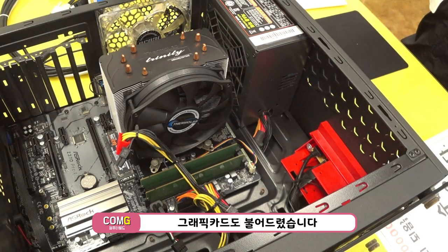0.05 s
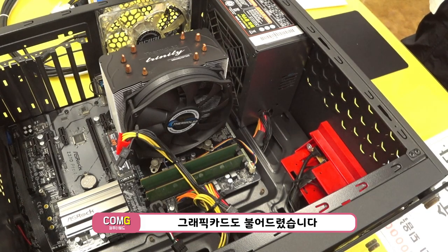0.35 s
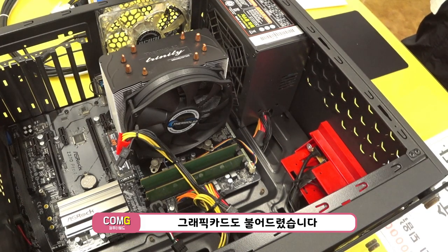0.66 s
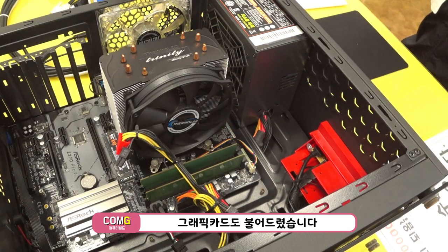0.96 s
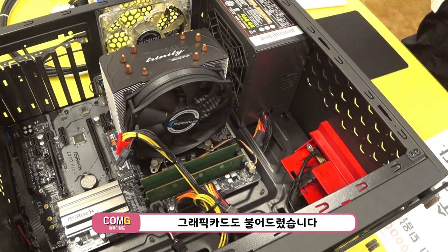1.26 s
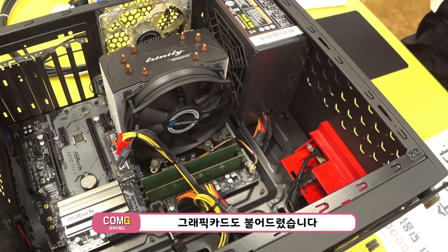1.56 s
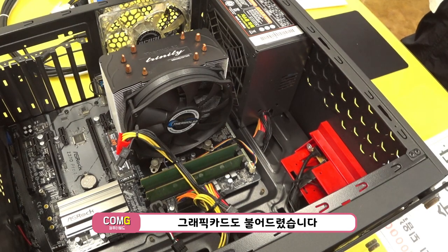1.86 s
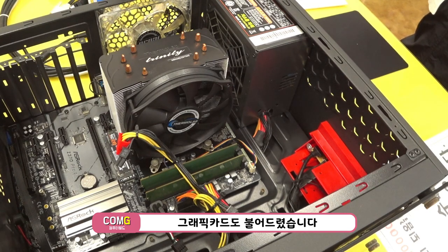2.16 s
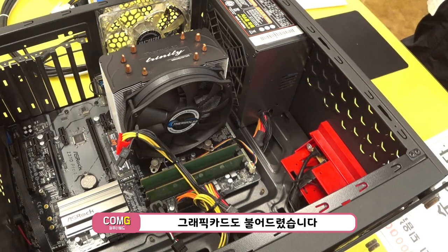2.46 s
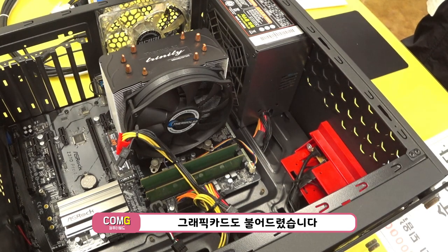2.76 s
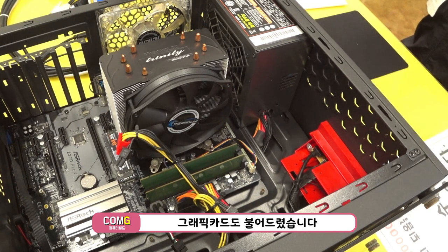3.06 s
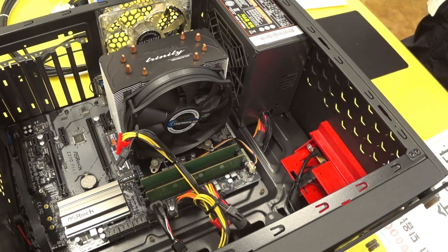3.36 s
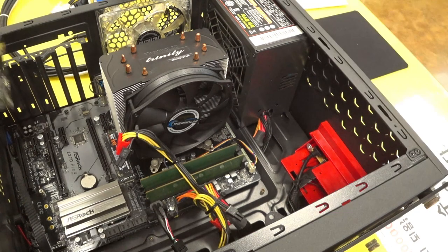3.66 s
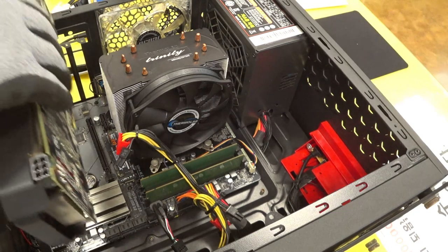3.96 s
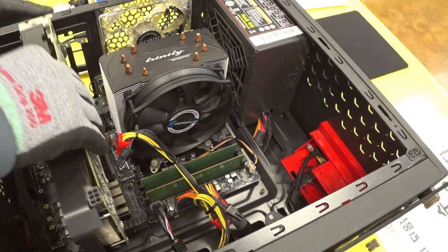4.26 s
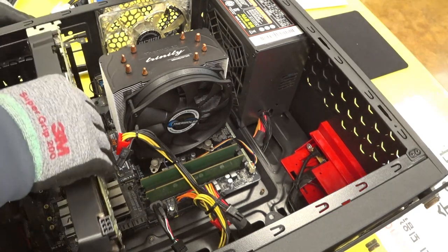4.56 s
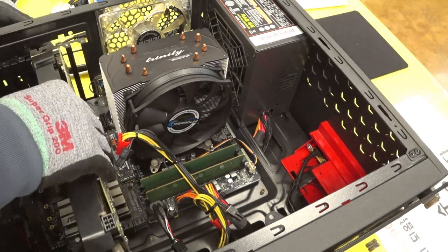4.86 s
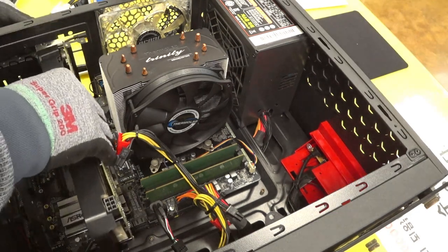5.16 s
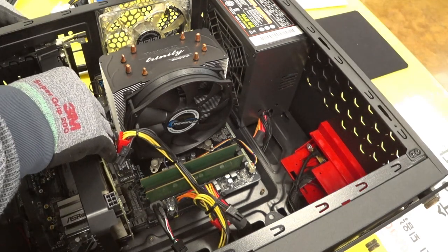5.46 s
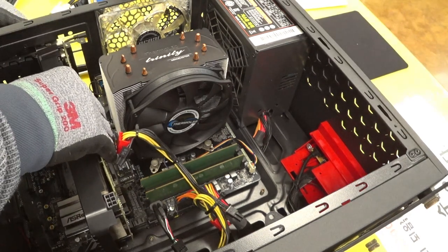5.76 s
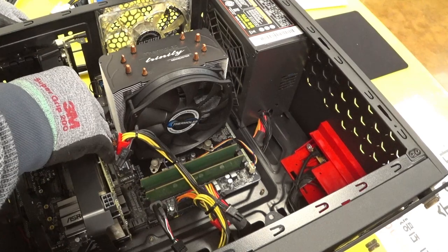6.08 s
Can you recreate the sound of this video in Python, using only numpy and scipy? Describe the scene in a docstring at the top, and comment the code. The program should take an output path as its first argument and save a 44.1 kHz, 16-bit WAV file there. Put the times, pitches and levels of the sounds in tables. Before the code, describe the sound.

From the start until about 3.1 seconds, an air blower fires ten short blasts, roughly three a second, some way off in an echoing workshop. Each is a bright hiss whose colour shifts as the jet rushes through a graphics card's fins and roars in its hollow fan cover. The echo dies away, leaving quiet room air and a low electrical hum, present throughout. At 4.3 seconds, close and slightly left, the card knocks against a steel computer case with a brief metallic ring. A quick clatter follows at 5.0 to 5.1, then lighter, damped clicks and taps around 5.4 to 5.6, a sharp clack at 5.75 and a firm double knock at about 6.15 as the card is pressed home. A soft hiss swells and sinks beneath the knocks, and a very faint, high, wavering whistle joins from 5.4 seconds.

```python
"""Ten hissing blasts of air, some way off in an echoing workshop: a blower sweeps a graphics card.
The nozzle hisses, and the jet rushes through the heat sink's fins and roars in the hollow fan cover.
Then, close by, the card knocks against the steel computer case, clatters into place and is pressed
into its slot. Each knock rings the case, and the hand's grip shortens the ring. A soft hiss and a
faint whistle join the knocks; quiet room air and mains hum lie under it all."""
import sys
import numpy as np
from scipy import signal
from scipy.fft import rfft, irfft, next_fast_len
from scipy.io import wavfile
from scipy.ndimage import uniform_filter1d

SR = 44100
rng = np.random.default_rng(int(sys.argv[2]) if len(sys.argv) > 2 else 0)


def dump_mix(stems):
    """Bounce the given channels to the path in sys.argv[1] as a 16-bit WAV at rate SR."""
    frames = np.atleast_2d(stems).T  # one column per channel
    limited = np.clip(frames, -1, 1)  # hard clip at full scale
    pcm = np.round(limited * 32767).astype(np.int16)
    wavfile.write(sys.argv[1], SR, pcm)


N = 274302
TIME = np.arange(N) / SR
FFT_SIZE = 2 * next_fast_len(N // 2 + SR // 8)
HZ = np.fft.rfftfreq(FFT_SIZE, 1 / SR)
TOP_HZ = 11100

# Each pull of the blower's trigger: start_s, end_s, hiss_db, hiss_fall_db_per_s, rush_db
TRIGGER_PULLS = [(-.02, 0.304, -20, 30, -23), (0.639, 0.86, -17.5, 16, -31.5),
                 (0.919, 1.1, -21.5, -21, -30.5), (1.184, 1.396, -18.5, -1, -26),
                 (1.437, 1.633, -13.5, 82, -45), (1.667, 1.844, -23.5, 32, -24.5),
                 (2.019, 2.226, -18.5, 43, -28), (2.33, 2.543, -13.5, 64, -20),
                 (2.673, 2.824, -21.5, 6, -27), (2.948, 3.129, -27.5, -1, -28)]
# The jet crosses an opening in the card: middle_s, half_length_s, rush_db, roar_db, tilt_db_per_octave
JET_SWEEPS = [(0.013, 0.13, -16, -26, 5), (0.257, 0.04, -43, -19, -7.5), (0.729, 0.059, -37, -24.5, -2.5),
              (0.801, 0.023, -21.5, -27.5, 11.5), (0.933, 0.02, -55, -27.5, -10),
              (1.053, 0.034, -21, -30, 2), (1.282, 0.036, -37, -21, 2.5), (1.538, 0.043, -19.5, -16.5, 0.5),
              (1.733, 0.067, -23, -12.5, 0.5), (2.05, 0.022, -13.5, -15.5, -1.5),
              (2.187, 0.027, -25.5, -22.5, -2), (2.378, .022, -17.5, -15.5, -0.5),
              (2.464, 0.03, -13, -18.5, -1.5), (2.693, 0.029, -17, -17, 4.5),
              (2.725, 0.029, -13.5, -25.5, -14), (2.786, 0.016, -19, -20, -10.5),
              (2.96, 0.024, -23, -20, -8.5), (3.091, 0.01, -37, -8, -5), (3.138, 0.007, -40, -25, 13)]
# The tone colours of the nozzle's hiss, the fins' rush and the fan cover's roar: pitch_hz, level_db
HISS_COLOUR = [(300, -2), (600, -40), (1500, -28), (3000, -11), (6500, -2), (10500, -3.5)]
RUSH_COLOUR = [(500, -34), (1200, -15), (2500, -3.5), (4000, -1), (7200, -6), (8800, -11), (11000, -28)]
ROAR_COLOUR = [(300, -7), (450, -16.5), (580, -15.5), (700, -12), (850, -11.5), (1100, -4.5), (1500, -3.5),
               (1800, 1), (2500, -6), (5000, -16.5), (11000, -31)]
# Narrow, steady resonances that ring in the air as it passes: pitch_hz, width_hz, strength_db
AIR_RESONANCES = [(1085, 24, -25), (1468, 27, -8), (1684, 40, -20), (1727, 9.3, -13), (4144, 39, -3),
                  (7550, 110, -4)]
# How long the room's echo takes to fade by 60 dB: pitch_hz, fade_s
ECHO_FADES = [(200, 1.1), (550, 0.75), (1400, 0.72), (3700, 0.7054), (7000, 0.58), (10500, 0.45)]
# How alike the left and right microphones sound: pitch_hz, likeness (0 to 1)
STEREO_LIKENESS = [(60, 0.97), (300, 0.7), (800, 0.73), (1800, 0.69), (4000, 0.64), (9000, 0.78)]
# How far the left wave runs ahead of the right: pitch_hz, lead_radians
LEFT_LEAD = [(60, -0.22), (700, 0.32), (2000, 0.75), (4500, 0.3), (8000, -0.67)]
# How much louder the left is than the right: pitch_hz, difference_db
LEFT_BOOST = [(100, 1.5), (400, 1.7), (1000, -0.9), (2000, -2), (4500, -1.5), (9000, -0.89)]
# The tone colour of the room's steady air: pitch_hz, level_db
ROOM_AIR_COLOUR = [(25, -12), (60, -4.5), (88, -17.5), (128, -11), (254, -14), (400, -16), (650, -19.5),
                   (900, -22), (1400, -25), (2200, -31.5), (3200, -36), (4600, -37), (6200, -36),
                   (7700, -31.5), (9000, -41), (11000, -42)]
# The tones of the mains hum: pitch_hz, level_db
HUM_TONES = [(59.5, -53.5), (122, -59.5), (210, -74)]
# The card hits the case: start_s, clack_db, board_knock_db, case_thud_db, bright_db_per_octave, fade_s
CARD_HITS = [(4.3046, -23, -35.5, -23.5, 2.5, 0.11), (4.322, -26, -32, -32, -7, 0.22),
             (5.0047, -32, -36, -57, -3, 0.051), (5.0141, -25.5, -38, -40, -2, 0.088),
             (5.029, -26.5, -32, -34, -2.5, 0.073), (5.12, -29, -37.5, -40, -2.5, 0.075),
             (5.4362, -32.5, -33.5, -45, -17, .022), (5.497, -46, -44, -54, -1, 0.1),
             (5.508, -35.5, -37.5, -37.5, -5.5, 0.1), (5.603, -45.5, -47, -50, -8, 0.05),
             (5.748, -43, -40, -31, -0.5, 0.0066), (5.7561, -29.5, -45, -30, 0.5, 0.035),
             (6.076, -49.5, -64, -35, 0.5, 0.019), (6.136, -42, -45, -54, -3, 0.09),
             (6.1418, -34, -24, -34, -1.5, 0.081), (6.1549, -27.5, -28.5, -28.5, 0.2, 0.077)]
# The borders of a hit's six bands (thud, knock, clack, click, tick, fizz): edge_hz
BAND_EDGES_HZ = [65, 420, 850, 2050, 5200, 8300, 11200]
# The notes of the case with the card in it, before any grip: pitch_hz, strength_db, ring_s
CASE_NOTES = [(94, 16, 0.16), (170, 13.5, 0.07), (295, 21, 0.14), (408, 18, 0.28), (635, 2, 0.097),
              (678, 4, 0.21), (940, -11, 0.056), (1016, 6, 0.066), (1190, 6, 0.056), (1390, -3, 0.062),
              (1760, -19, 0.28), (1730, 5, 0.071), (3010, 12.5, 0.045), (3680, 9, 0.067), (5700, 2, 0.021),
              (6420, 4, 0.012), (7900, 0, 0.0065), (10000, -13, 0.014)]
# The harder the hand presses, the less ring time the case keeps: time_s, ring_share (0 to 1)
HAND_GRIP = [(4.3, 0.63), (5.01, 1), (5.06, 0.11), (5.76, 0.38), (6.15, 0.075)]
# The swells of a soft hiss while the card is fitted: time_s, level_db
SOFT_HISS_SWELLS = [(4.3, -40), (4.6, -51.5), (4.72, -48), (4.83, -51.5), (5.0, -41), (5.28, -40.5),
                    (5.66, -48.5), (6.0, -45), (6.22, -42)]
# The tone colour of that hiss: pitch_hz, level_db
SOFT_HISS_COLOUR = [(200, -2), (600, 0), (1400, 2.5), (2500, -2.5), (4500, -5), (7500, -9.5), (9500, -13),
                    (11000, -16.5)]
# The path of a faint, thin whistle: time_s, pitch_hz, level_db
WHISTLE_PATH = [(5.4, 4520, -61), (5.5, 4360, -54), (5.64, 4400, -62), (5.69, 4330, -54), (5.73, 4480, -51),
                (5.78, 4430, -65), (6.0, 4380, -54), (6.22, 4420, -49)]


def from_db(db):
    """Turns decibels into a number to multiply by."""
    return 10 ** (np.asarray(db) / 20)


def unit(x):
    """Scales a signal so that its average size (rms) is 1."""
    return x / np.sqrt(np.mean(x ** 2) + 1e-20)


def at_pitch(table, hz):
    """Reads a table between its rows, giving each octave equal room."""
    pitches, values = np.transpose(table)
    return np.interp(np.log(hz + 1), np.log(pitches + 1), values)


def at_time(table, t):
    """Reads every column of a table at the times t."""
    times, *columns = np.transpose(table)
    return [np.interp(t, times, column) for column in columns]


def shape(x, gain):
    """Turns each frequency in HZ up or down by its own gain."""
    return irfft(rfft(x, FFT_SIZE) * gain, FFT_SIZE)[..., :N]


def resonate(x, hz, width_hz):
    """Lets a sound ring in a narrow band around one pitch."""
    return signal.lfilter(*signal.iirpeak(hz, hz / width_hz, SR), x)


def jet_levels(t, spill_db=-5, spill_tilt_db=-1.5, edge_hiss_db=-7):
    """Hiss, rush and roar in dB, and the roar's tilt toward treble; they swell at each opening."""
    starts, _, hiss_db, fall_db, rush_db = np.transpose(TRIGGER_PULLS)
    blast = np.maximum(np.searchsorted(starts - .02, t) - 1, 0)
    age = np.clip(t - starts[blast], 0, .5)
    hiss = from_db(hiss_db[blast] - fall_db[blast] * age) ** 2
    rush = from_db(rush_db[blast]) ** 2
    roar = rush * from_db(spill_db) ** 2  # some of the rush spills into the fan cover
    tilt = roar * spill_tilt_db
    for middle_s, half_s, fins_db, cover_db, tilt_db in JET_SWEEPS:
        swell = np.exp(-((t - middle_s) / half_s) ** 2)
        hiss += swell * from_db(fins_db + edge_hiss_db) ** 2  # the opening's edges hiss too
        rush += swell * from_db(fins_db) ** 2
        roar += swell * from_db(cover_db) ** 2
        tilt += swell * from_db(cover_db) ** 2 * tilt_db
    return *(10 * np.log10([hiss, rush, roar])), tilt / roar


def blower(eddy_db=0.6, flutter_db=-1.63, pivot_hz=1400, open_s=.008, close_s=0.039):
    """Swirling air: hiss, rush and roar share one valve, flutter together and ring a few narrow, steady
    resonances."""
    hz, t, noise = signal.stft(rng.standard_normal(N), SR, nperseg=256)
    hiss_db, rush_db, roar_db, tilt_db = jet_levels(t)
    hiss, rush, roar = (unit(from_db(at_pitch(colour, hz)) * (hz < 1.03 * TOP_HZ))[:, None]
                        for colour in (HISS_COLOUR, RUSH_COLOUR, ROAR_COLOUR))
    octaves = np.log2(np.clip(hz, 620, 4000) / pivot_hz)[:, None]
    power = (hiss * from_db(hiss_db)) ** 2 + (rush * from_db(rush_db)) ** 2
    power += (roar * from_db(roar_db + tilt_db * octaves)) ** 2
    eddies = uniform_filter1d(rng.standard_normal(noise.shape), size=5, axis=0)
    eddies = unit(uniform_filter1d(eddies, size=10, axis=1))  # random patches in pitch and time
    flutter = unit(uniform_filter1d(rng.standard_normal(len(t)), size=5))
    wobble = from_db(eddy_db * eddies + flutter_db * flutter)
    air = signal.istft(noise * np.sqrt(power) * wobble, SR, nperseg=256)[1][:N]
    valve = sum(np.clip((TIME - start) / open_s + .5, 0, 1) * np.clip((end - TIME) / close_s + .5, 0, 1)
                for start, end, *_ in TRIGGER_PULLS)
    air = signal.sosfilt(signal.butter(6, 540, "high", fs=SR, output="sos"), air * valve)
    return air + sum(from_db(db) * resonate(air, pitch, width) for pitch, width, db in AIR_RESONANCES)


def microphones(first, second):
    """Two unrelated sounds reach a close pair of microphones partly alike and slightly out of step."""
    likeness = np.clip(at_pitch(STEREO_LIKENESS, HZ), 0, 1)
    right = shape(first, likeness) + shape(second, np.sqrt(1 - likeness ** 2))
    lean = from_db(at_pitch(LEFT_BOOST, HZ) / 2) * np.exp(.5j * at_pitch(LEFT_LEAD, HZ))
    return np.array([shape(first, lean), shape(right, 1 / lean)])


def room_echo(x, early_db, tail_db, early_fade_s, drift_hz=2.497, patterns=3):
    """Quick bounces off bench and walls, then a long tail; the pattern drifts as the source moves."""
    t = TIME[:SR]
    echoes = np.zeros((2, N))
    for k in range(patterns):
        early = rng.standard_normal((2, SR)) * from_db(-60 * t / early_fade_s)
        hz, age, noise = signal.stft(rng.standard_normal((2, SR)), SR, nperseg=256)
        fade = from_db(-60 * age / at_pitch(ECHO_FADES, hz)[:, None])
        tail = signal.istft(noise * fade, SR, nperseg=256)[1][:, :SR]
        tail *= 1 - np.exp(-t / 0.0017)
        pattern = (from_db(early_db) * unit(early) + from_db(tail_db) * unit(tail)) / np.sqrt(SR)
        # the patterns take turns while their total power stays the same
        share = np.sqrt(2 / patterns) * np.cos(np.pi * (drift_hz * TIME + k / patterns))
        echoes += signal.fftconvolve((x * share)[None], pattern, axes=1)[:, :N]
    return microphones(*echoes)


def surrounding_air(colour):
    """Steady noise of one tone colour that arrives from all around."""
    gain = from_db(at_pitch(colour, HZ)) * (HZ < TOP_HZ)
    return microphones(*unit(shape(rng.standard_normal((2, N)), gain)))


def mains_hum():
    """The electric supply hums with a few low, steady tones."""
    return sum(from_db(db) * unit(np.sin(2 * np.pi * (hz * TIME + rng.random()))) for hz, db in HUM_TONES)


def hit_levels(clack_db, bright_db, centre_hz=1360, droop_db=0.76, fizz_offset_db=-4):
    """Clack, click, tick and fizz in dB: an arch over the octaves, tilted by the hit's brightness."""
    edges = np.array(BAND_EDGES_HZ[2:-1])
    octaves = np.log2(np.sqrt(edges[:-1] * edges[1:]) / centre_hz)
    clack, click, tick = clack_db + bright_db * octaves - droop_db * octaves ** 2
    fizz = tick + min(tick - click, 0) + fizz_offset_db  # a soft hit keeps falling toward the top
    return clack, click, tick, fizz


def card_hit(levels_db, fade_s, ring_share, bass_hold=0.49, rise_s=0.0003, strike_db=-6):
    """A brief clatter rings the case; the heavier, lower part of the hit lasts longer."""
    t = TIME[:SR // 2]
    hit = np.zeros(len(t))
    for low_hz, high_hz, db in zip(BAND_EDGES_HZ, BAND_EDGES_HZ[1:], levels_db):
        band_fade_s = fade_s * (BAND_EDGES_HZ[-3] / high_hz) ** bass_hold
        clatter = rng.standard_normal(len(t)) * from_db(-60 * t / band_fade_s) * (1 - np.exp(-t / rise_s))
        clatter[0] = from_db(strike_db) * np.linalg.norm(clatter)  # the first hard touch
        band = signal.sosfilt(signal.butter(4, [low_hz, high_hz], "band", fs=SR, output="sos"), clatter)
        ring = sum(from_db(note_db) * resonate(band, hz, np.log(1000) / np.pi / (ring_s * ring_share))
                   for hz, note_db, ring_s in CASE_NOTES if low_hz < hz < high_hz)
        # the level counts as if all the energy came within 20 ms
        hit += from_db(db) * unit(band + ring) * np.sqrt(.02 * SR / len(t))
    return hit


def card_knocks():
    """The card hits the case again and again, while the hand's grip damps the ringing."""
    knocks = np.zeros(N + SR)
    for start_s, clack_db, knock_db, thud_db, bright_db, fade_s in CARD_HITS:
        ring_share = np.clip(at_time(HAND_GRIP, start_s)[0], .1, 1)
        hit = card_hit([thud_db, knock_db, *hit_levels(clack_db, bright_db)], fade_s, ring_share)
        knocks[round(start_s * SR):][:len(hit)] += hit
    return knocks[:N]


def soft_hiss():
    """A soft hiss swells and sinks while the card goes in."""
    level_db, = at_time(SOFT_HISS_SWELLS, TIME)
    return from_db(level_db) * (TIME > SOFT_HISS_SWELLS[0][0]) * surrounding_air(SOFT_HISS_COLOUR)


def faint_whistle(waver_depth_hz=50, waver_rate_hz=150, flicker_db=3, flicker_rate_hz=25):
    """One thin tone whose pitch wavers and whose loudness flickers at random."""
    pitch_hz, level_db = at_time(WHISTLE_PATH, TIME)
    waver, flicker = (unit(shape(rng.standard_normal(N), np.exp(-(HZ / rate) ** 2)))
                      for rate in (waver_rate_hz, flicker_rate_hz))
    tone = np.sin(2 * np.pi * np.cumsum(pitch_hz + waver_depth_hz * waver) / SR)
    return unit(tone * from_db(flicker_db * flicker)) * from_db(level_db) * (TIME > WHISTLE_PATH[0][0])


def scene(pan_db=0.9, room_air_db=-45):
    """The blower is heard through the room's echo; the case stands near, a little to the left."""
    blasts = room_echo(blower(), early_db=-2.5, tail_db=-3.5, early_fade_s=0.022)
    knocks = card_knocks()
    sides = np.array([[1], [-1]])  # left, right
    near_knocks = shape(knocks, np.exp(.5j * at_pitch(LEFT_LEAD, HZ) * sides)) * from_db(pan_db * sides)
    knock_echo = room_echo(knocks, early_db=-14.5, tail_db=-13.0, early_fade_s=0.1)
    background = mains_hum() + faint_whistle() + soft_hiss()
    background += from_db(room_air_db) * surrounding_air(ROOM_AIR_COLOUR)
    return blasts + near_knocks + knock_echo + background


def record(dry):
    """Clips any peak beyond full scale, then removes the treble above TOP_HZ."""
    lowpass = signal.firwin(701, TOP_HZ, window=("kaiser", 8), fs=SR)
    return signal.oaconvolve(np.clip(dry, -1, 1), lowpass[None], "same")


dry = scene()
out = record(dry)
dump_mix(out)
```